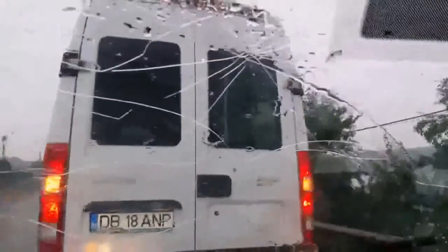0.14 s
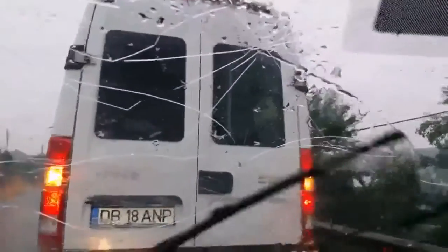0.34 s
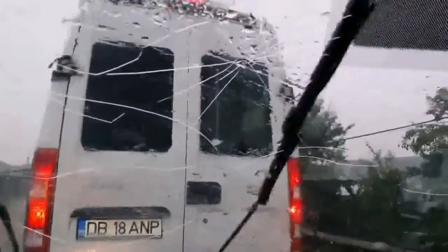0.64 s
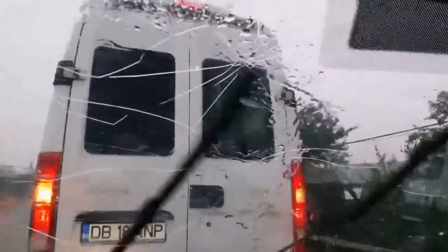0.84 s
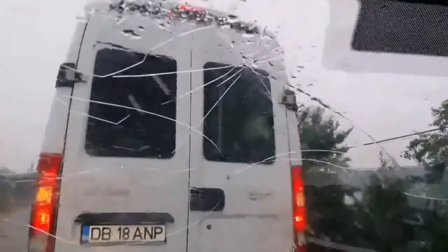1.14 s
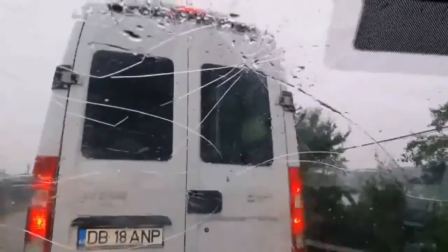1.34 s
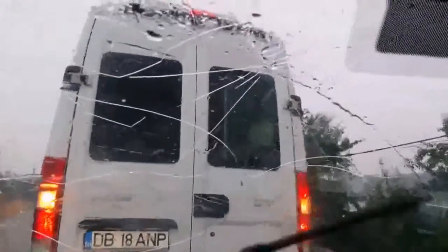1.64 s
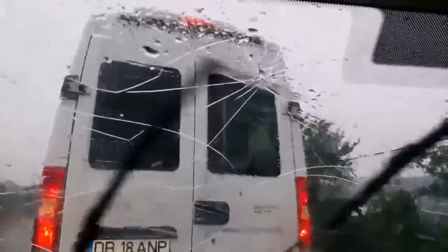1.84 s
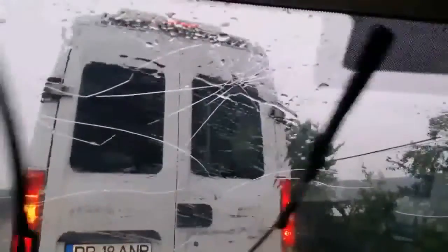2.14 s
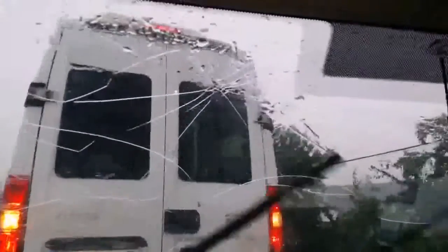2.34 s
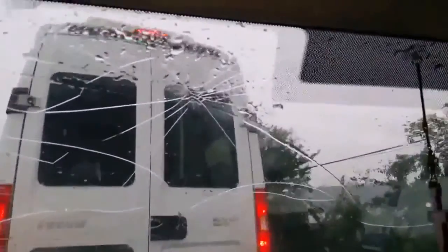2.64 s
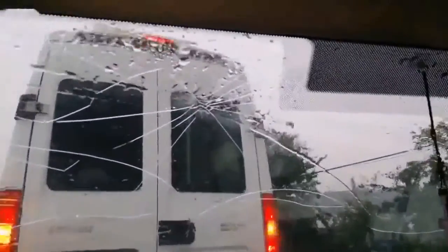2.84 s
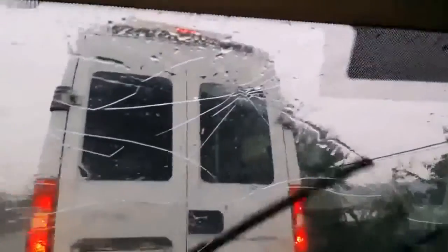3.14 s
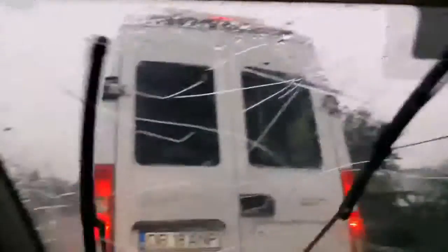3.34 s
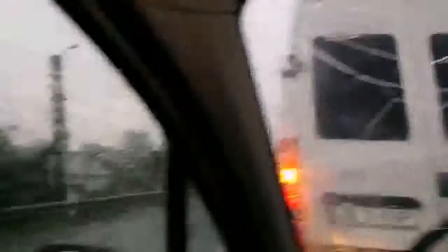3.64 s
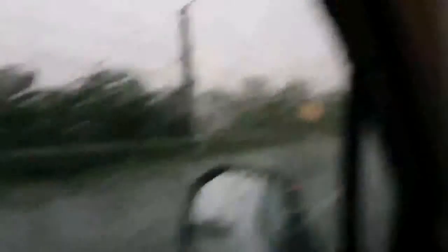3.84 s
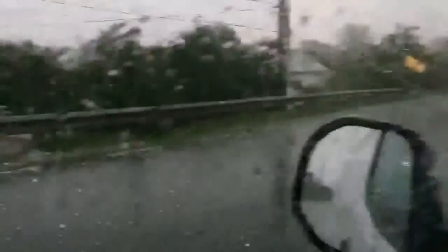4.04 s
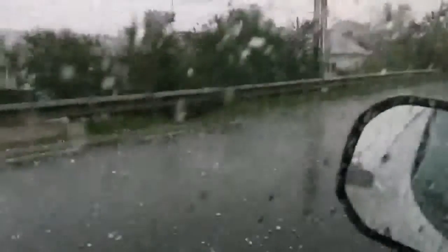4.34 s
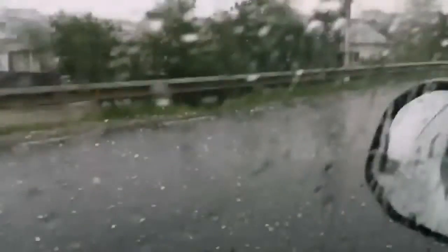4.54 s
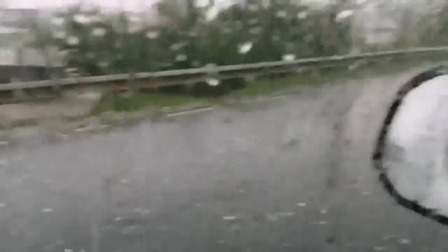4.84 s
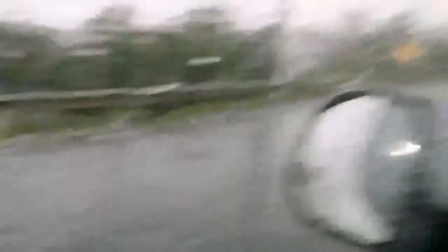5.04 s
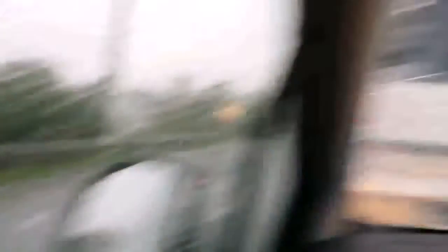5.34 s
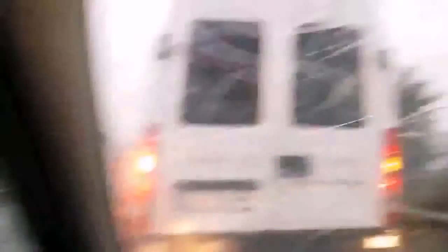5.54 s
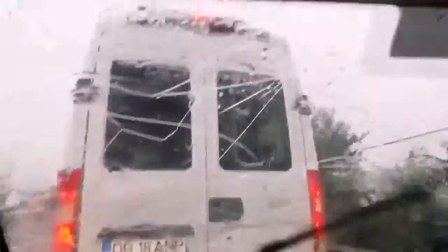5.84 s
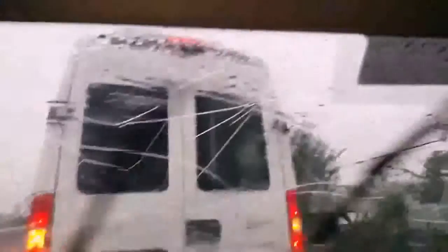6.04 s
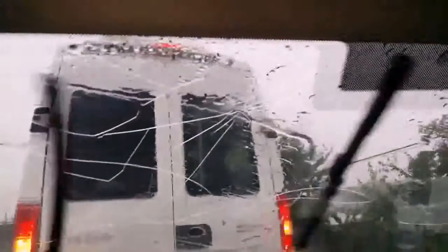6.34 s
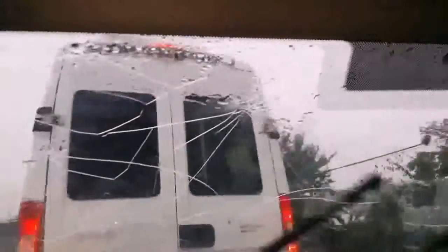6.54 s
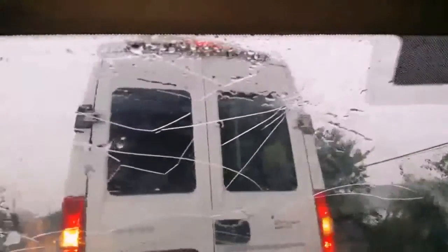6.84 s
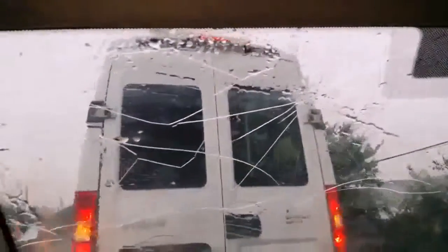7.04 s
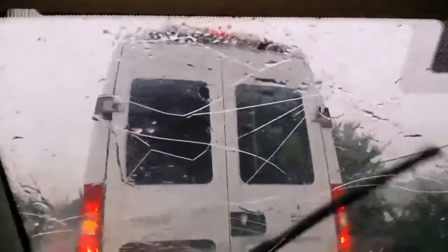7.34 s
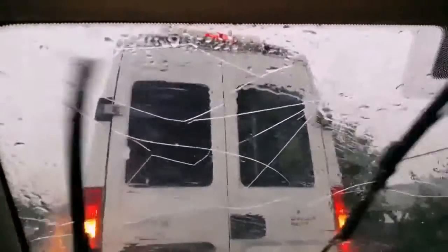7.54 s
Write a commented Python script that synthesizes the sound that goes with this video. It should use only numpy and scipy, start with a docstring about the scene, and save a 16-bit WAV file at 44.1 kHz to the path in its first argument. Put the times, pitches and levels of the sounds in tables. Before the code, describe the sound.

Loud, irregular hail impacts heard from inside a car: hollow metal roof thuds, sharp glass cracks, fine icy patter and a low steady rumble.

```python
"""A bright crack of ice on glass comes first; then big hailstones boom on a car's steel roof.
More cracks fall on the panes and small stones tick between them, over road rumble and the hiss of sleet.
Each source is band noise, its power shaped by blows that build up and ring out or by a steady bed.
The cabin adds narrow resonances; the recorder's limiters flatten the loudest blows."""
import sys
import numpy as np
from scipy import signal
from scipy.io import wavfile
from scipy.ndimage import uniform_filter1d, minimum_filter1d

SR = 44100
rng = np.random.default_rng(int(sys.argv[2]) if len(sys.argv) > 2 else 0)


def put_to_file(sound):
    """Save the sound as 16-bit audio at rate SR, in the file named by the first command-line argument."""
    columns = np.atleast_2d(sound).T  # one column per channel
    safe = np.clip(columns, -1, 1)
    whole_steps = np.round(safe * 32767)
    wavfile.write(sys.argv[1], SR, whole_steps.astype(np.int16))


N = 338688

# Big stones on the roof; levels are relative:
# start_s, force_db, hollow_thud_db, hardness_db, ring_length [factor on t60]
ROOF_BLOWS = [(0.434, -9.5, 0.5, 1, 0.86), (.515, -7, -0.5, -8.5, 0.74), (0.97, -0.5, -1.5, -0.5, 0.98),
              (1.304, -6.5, 0.5, 4, 1.08), (1.811, -2, 1.5, 0, 1.234), (2.225, -12, -2, -15, 0.4),
              (2.786, -6, 1.5, -13.5, 0.73), (2.987, -6.5, 1.5, 0, 0.91), (3.926, -21, 9.5, 0.5, 0.77),
              (5.081, -24, 9, -6, 0.66), (5.122, -11, 7, -3.5, 0.79), (6.115, -1.5, 0, -3, 1.21),
              (6.441, -5, 3.5, 4.5, 1.03), (6.731, -6, 0, -0.5, 1.23), (7.159, -4, -4.5, 0.5, 1.13),
              (7.300, -23, -4, -5.5, 1.7)]
# Big stones on the glass; levels are relative:
# start_s, force_db, boom_db, hardness_db, ring_length [factor on t60]
GLASS_BLOWS = [(0.031, 7, 3, 1, 0.68), (1.424, -2, 1.5, 6.5, 0.81), (2.448, 2.5, -10.5, 1, 1.09),
               (3.376, -0.5, -4.5, -5.5, 1), (4.162, 5, 6.5, 5.5, 0.68), (4.198, 3.5, 6, -5, 0.51),
               (4.563, -2.5, 0, 5, 0.83), (4.669, -13, 8.5, 4.5, 0.72), (4.8, -25.5, 1, 9, 1.06),
               (5.527, -2, -11.5, 2, 0.9), (7.057, -29.5, 13.5, 21.5, 0.82), (7.237, -0.5, 3, 0, 0.9),
               (7.358, -6, -11, -2, 0.97), (7.414, 1, -11, 0.5, 0.72)]
# The clearest small stones: start_s, relative force_db, ring_length [factor on t60]
SINGLE_TICKS = [(.124, -25.5, 0.89), (.294, -27.5, 1.4), (.324, -31, 1.1), (.591, -22.5, 0.86),
                (.773, -19, .25), (1.146, -32, 1.35), (1.653, -30.5, 0.37), (2.093, -27.5, 1.3),
                (2.177, -34, 1.6), (2.342, -33.5, .8), (2.555, -31, 0.27), (2.612, -33, 0.63),
                (2.64, -32, 2.2), (2.699, -29, 0.42), (2.757, -28, 0.5), (2.963, -26, 0.19),
                (3.471, -26.5, 1.36), (3.537, -30.5, 1.6), (3.624, -31.5, 0.91), (4.071, -33.5, 0.49),
                (4.133, -16.5, 0.33), (4.351, -27.5, 0.25), (4.909, -27.5, 0.56), (5.671, -30, 1.6),
                (5.739, -29, 1.8), (5.817, -28.5, 3.5), (6.261, -18.5, 0.45), (6.978, -28, 0.56),
                (7.036, -24.5, 0.4), (7.122, -21, 0.95)]

# Spectrum and decay of the struck steel roof:
# frequency_hz, relative density_db [per Hz], t60_s [before the ring length factor]
ROOF_MODES = [(59.5, -12.5, 0.596), (109.4, -0.9, 1), (182, 1, 0.85), (316, -1.34, 0.71), (573, -3, 0.54),
              (1070, -8, 0.32), (1410, -6, 0.3), (2085, -10, 0.24), (3030, -14.5, 0.19),
              (5270, -11.5, 0.17), (7100, -38, 0.19)]
# The same for the struck glass: frequency_hz, relative density_db [per Hz], t60_s
GLASS_MODES = [(59.7, -7.5, 0.3), (112.4, 2, 0.5), (186, 0.5, 0.43), (326, -3, 0.32), (556, -4.5, 0.2),
               (980, -3, 0.12), (1360, -11, 0.15), (1890, -1, 0.065), (2940, -8, 0.1), (5130, -5.5, 0.074),
               (6800, -18, 0.05)]
# The same for small pellets: frequency_hz, relative density_db [per Hz], t60_s
PELLET_MODES = [(61.5, 2.5, 0.13), (110, -4, 0.13), (180, 5, 0.15), (350, 7.5, 0.092), (600, 2.5, 0.17),
                (1000, -2, 0.2), (1390, -4, 0.3), (2010, -2, 0.13), (3200, 0.5, 0.14), (4940, 4, 0.12),
                (7150, -8.5, 0.046)]

# Spectrum of road rumble and sleet hiss, before their levels: frequency_hz, density_db [per Hz]
BED_SPECTRUM = [(25, -65), (60, -62.5), (110, -56.5), (180, -59), (350, -65), (600, -74), (1000, -80),
                (1400, -82.5), (2000, -85.5), (3200, -92.5), (5000, -89.5), (7000, -102)]
# Course of the bed's relative levels: time_s, rumble_db, hiss_db
BED_LEVELS = [(0.0, 0.5, 10), (1.5, -3, 3), (3.1, -4, 9), (4.6, -3, 8.5), (6.1, -3.5, 6), (7.7, -4, 13.5)]

# Between the two microphones:
# frequency_hz, likeness [correlation, 0 to 1], left_lag_ms [at bearing 1]
MICROPHONE_LIKENESS = [(30, 0.94, 0.04), (70, 1, 0.12), (130, 1, 0.22), (300, 0.86, 0), (623, 0.43, 0),
                       (1200, 0.6, 0.53), (2480, 0.077, 0.47), (6000, 0.13, .45)]
# Lean of the cabin's sound: frequency_hz, left_minus_right_db
CABIN_BALANCE = [(60, 2.5), (100, -1.5), (170, 1.5), (290, -1), (490, 0), (840, -1.5), (1420, -5),
                 (2400, -2.5), (4060, 11.5), (6880, -16)]
# Resonances of the cabin and its panes: frequency_hz, width_hz, lift_db
CABIN_RESONANCES = [(119.5, 18, -11), (176, 7.5, -7), (264.8, 5.3, -8.5), (320, 11, -3), (362.8, 7.3, -1),
                    (482.5, 3.2, -6), (518.4, 13, -4), (802, 8.7, -12), (1390, 15, -19), (3540, 50, -8),
                    (4670, 46, -20)]

EDGES = np.geomspace(25, 9000, 23)   # Hz
CENTRES = np.sqrt(EDGES[1:] * EDGES[:-1])   # Hz

# A hard stone snaps as it lands on steel; a slushy one only thuds
SNAP_DB, SNAP_PER_HARDNESS = -1, 0.7   # dB, dB per dB
SQUASH_PER_HARDNESS = 0.44   # dB by which the build-up lengthens per dB of softness
ROOF_BOOM_DB = 3.5
# The bigger a pellet, the duller: dB of treble lost per dB of force above a middling one
PELLET_DULLING, MIDDLING_PELLET_DB = 0.25, -34
# Where the blows come from (left minus right, dB), and the scatter of the big ones
ROOF_SIDE_DB, GLASS_SIDE_DB, PELLET_SIDE_DB, SCATTER_DB = -1.1, -2, -1, 2.36
# Shattering ice and shaking trim make every ring-out uneven
RATTLE_DB, RATTLE_PER_S = 1.5, 180


def roof_stones(level_db, rise_cycles, rise_s):
    """Impact on a steel panel: hard stones excite more treble, soft ones squash and build up slowly."""
    power = silent_power()
    gains, t60s = band_gains(ROOF_MODES), per_band(ROOF_MODES, column=2)
    places = rng.standard_normal(len(ROOF_BLOWS))
    for (s, force_db, thud_db, hard_db, ring), place in zip(ROOF_BLOWS, places):
        # some spots answer with a hollow thud
        colour = per_band([(120, ROOF_BOOM_DB), (170, 0), (240, thud_db), (380, thud_db),
                           (620, 0), (1800, 0), (4500, hard_db)])
        blow = gains * from_db(level_db + force_db + colour)
        side_db = ROOF_SIDE_DB + SCATTER_DB * place
        snap = from_db(SNAP_DB + SNAP_PER_HARDNESS * hard_db)
        squash_s = rise_s * from_db(-SQUASH_PER_HARDNESS * hard_db)
        add_blow(power, s, blow, t60s * ring, side_db, rise_cycles, snap, squash_s)
    return power * rattle()


def glass_stones(level_db, rise_cycles, rise_s, thud_share=0.4):
    """Impact on stiff panes: a short crack, brighter with hardness, over a boom that varies with the spot."""
    power = silent_power()
    gains, t60s = band_gains(GLASS_MODES), per_band(GLASS_MODES, column=2)
    places = rng.standard_normal(len(GLASS_BLOWS))
    for (s, force_db, boom_db, hard_db, ring), place in zip(GLASS_BLOWS, places):
        colour = per_band([(110, boom_db), (350, thud_share * boom_db), (750, 0),
                           (1800, 0), (4500, hard_db)])
        blow = gains * from_db(level_db + force_db + colour)
        side_db = GLASS_SIDE_DB + SCATTER_DB * place
        add_blow(power, s, blow, t60s * ring, side_db, rise_cycles, rise_s=rise_s)
    return power * rattle()


def small_stones(level_db, patter_db, spread_db, colour_db, scatter_db, patter_ring, count):
    """Superposition of light impacts: single ticks over a random patter, each pellet with its own colour."""
    power = silent_power()
    gains, t60s = band_gains(PELLET_MODES), per_band(PELLET_MODES, column=2)
    slot_s = N / SR / count
    patter = []
    for k, (when, size, ring) in enumerate(rng.random((count, 3))):   # one grain somewhere in each slot
        patter.append(((k + when) * slot_s, patter_db + spread_db * size, patter_ring * (.5 + ring)))
    for s, force_db, ring in patter + list(SINGLE_TICKS):
        treble_db = -PELLET_DULLING * max(force_db - MIDDLING_PELLET_DB, 0)
        colour = per_band([(1800, 0), (4500, treble_db)])
        colour = colour + colour_db * rng.standard_normal(len(CENTRES))
        blow = gains * from_db(level_db + force_db + colour)
        side_db = PELLET_SIDE_DB + scatter_db * rng.standard_normal()
        add_blow(power, s, blow, t60s * ring, side_db, rise_cycles=1.0, rise_s=0.00081)
    return power


def road_and_sleet(rumble_db, hiss_db, split_hz=800, flurry_db=2.5, count=120):
    """Addition of independent noise powers: tyres and engine mostly below the split, fine sleet above."""
    bands = from_db(per_band(BED_SPECTRUM)) ** 2 * np.diff(EDGES)
    rumble, hiss = in_time(BED_LEVELS)
    flurries = np.interp(np.arange(N), np.linspace(0, N, count), rng.standard_normal(count))
    hiss = hiss + flurry_db * flurries   # the sleet arrives in uneven flurries
    sleet_share = 1 / (1 + (split_hz / CENTRES) ** 2)
    tyres = np.outer(bands * (1 - sleet_share), from_db(rumble + rumble_db) ** 2)
    sleet = np.outer(bands * sleet_share, from_db(hiss + hiss_db) ** 2)
    return (tyres + sleet).astype(np.float32)


def add_blow(power, s, gains, t60s, side_db, rise_cycles, snap=0, rise_s=0.00073):
    """Exponential build-up and decay of struck modes, band by band; the powers of blows sum."""
    start, t60s = round(s * SR), np.maximum(t60s, .01)
    for k, (hz, gain, t60) in enumerate(zip(CENTRES, gains, t60s)):
        t = np.arange(min(int(t60 * SR * 1.3), N - start), dtype=np.float32) / SR
        build = 1 - np.exp(-t / (rise_cycles / hz + rise_s))
        snap_t60 = 0.08 + 12 / hz
        ring_out = np.exp(-np.log(1e6) * t / t60)   # power falls 60 dB in t60
        fade = ring_out + snap ** 2 * np.exp(-np.log(1e6) * t / snap_t60)
        sides = pan(side_db * hz / (hz + 500))   # the bass reaches both microphones alike
        power[:, k, start:start + len(t)] += (gain * sides) ** 2 * (build ** 2 * fade)


def rattle():
    """Amplitude modulation: a fast, uneven swing of power shared by all bands of a struck panel."""
    knots = rng.standard_normal(N * RATTLE_PER_S // SR + 2)
    swing = np.interp(np.arange(N) * RATTLE_PER_S / SR, np.arange(len(knots)), knots)
    return (from_db(RATTLE_DB * swing) ** 2).astype(np.float32)


def noise_bands(evenness, bearing):
    """Modal overlap: modes too close to tell apart act as stereo noise of rms 1 in each band."""
    white, bands = rng.standard_normal((2, 2, N)), []
    likeness = np.clip(per_band(MICROPHONE_LIKENESS), -.99, .99)
    # bearing: 0 straight ahead, 1 well to the right
    lag_ms = bearing * per_band(MICROPHONE_LIKENESS, column=2)
    for k, (alike, lean_db) in enumerate(zip(likeness, per_band(CABIN_BALANCE))):
        band_pass = signal.butter(2, EDGES[k:k + 2], "band", fs=SR, output="sos")
        mid, side = signal.sosfilt(band_pass, white[k % 2])
        pair = np.sqrt(1 + alike) * mid + np.sqrt(1 - alike) * side * [[1], [-1]]
        pair[0] = np.roll(pair[0], round(lag_ms[k] * SR / 1000))
        swell = uniform_filter1d(np.mean(pair ** 2, axis=0), size=2000) + 1e-18
        # ringing modes beat less deeply than free noise
        pair = pan(lean_db) * pair / swell ** (evenness / 2)
        bands.append(pair / pair.std())
    return np.array(bands, dtype=np.float32)


def sounding(power, evenness, bearing):
    """Amplitude is the root of power: band powers (2 x bands x N) scale the crowded modes, then sum."""
    return np.einsum("cbn,bcn->cn", np.sqrt(power), noise_bands(evenness, bearing))


def cabin(x, through_db=-1):
    """Resonance of an enclosure: narrow peaks are added to everything that sounds in the cabin."""
    out = from_db(through_db) * x
    for hz, width, lift_db in CABIN_RESONANCES:
        b, a = signal.iirpeak(hz, hz / width, fs=SR)
        out = out + from_db(lift_db) * signal.lfilter(b, a, x)
    return out


def from_db(db):
    """Decibel law: level in dB to amplitude."""
    return 10 ** (np.asarray(db) / 20)


def in_time(rows):
    """Linear interpolation: the columns of a curve, sample by sample."""
    s, *columns = np.transpose(rows)
    return [np.interp(np.arange(N) / SR, s, c) for c in columns]


def per_band(points, column=1):
    """Interpolation over log frequency: one column of a table, read at the band centres."""
    points = np.array(points)
    return np.interp(np.log(CENTRES), np.log(points[:, 0]), points[:, column])


def band_gains(points):
    """Density times bandwidth is power: band amplitudes of a spectrum scaled to total power 1."""
    gain = from_db(per_band(points)) * np.sqrt(np.diff(EDGES))
    return gain / np.linalg.norm(gain)


def pan(db):
    """Interchannel level difference, split evenly into left and right gains."""
    return from_db(np.array([[.5], [-.5]]) * db)


def silent_power():
    """Zero energy before any blow: channels x bands x samples."""
    return np.zeros((2, len(CENTRES), N), np.float32)


def scene():
    """Superposition in the cabin: roof and road share one bearing, glass and pellets one further right."""
    roof = roof_stones(level_db=1.0, rise_cycles=0.44, rise_s=0.0052)
    roof += road_and_sleet(rumble_db=1.5, hiss_db=-3)
    glass = glass_stones(level_db=1.0, rise_cycles=0.33, rise_s=0.0014)
    glass += small_stones(level_db=2, patter_db=-48, spread_db=13, colour_db=4.5,
                          scatter_db=4.5, patter_ring=0.48, count=230)
    overhead = sounding(roof, evenness=0.52, bearing=0.7)
    beside = sounding(glass, evenness=0.7, bearing=0.97)
    return cabin(overhead + beside)


def limiter(x, ceiling_db, release_db_per_s, ahead_s):
    """Look-ahead gain control: turns down just before each peak and recovers at a steady rate."""
    over = np.maximum(20 * np.log10(np.abs(x).max(axis=0) + 1e-9) - ceiling_db, 0)
    ramp = release_db_per_s * np.arange(N) / SR
    held = np.maximum.accumulate(over + ramp) - ramp
    size = 2 * int(ahead_s * SR / 2) + 1
    ahead = -minimum_filter1d(-held, size, origin=-(size // 2))
    return x * from_db(-uniform_filter1d(ahead, size))


def record(dry, low_cut_hz=35, split_hz=900, top=1.155, treble_cut_hz=7350):
    """Two-band compression and saturation: bass cut, limiters, rounded peaks, treble cut, clipping."""
    lean = signal.sosfilt(signal.butter(1, low_cut_hz, "high", fs=SR, output="sos"), dry)
    bass = signal.sosfilt(signal.butter(2, split_hz, fs=SR, output="sos"), lean)
    # inverted, so the crossover leaves no notch
    treble = -signal.sosfilt(signal.butter(2, split_hz, "high", fs=SR, output="sos"), lean)
    bass = limiter(bass, ceiling_db=-1, release_db_per_s=431, ahead_s=0.016)
    treble = limiter(treble, ceiling_db=5.0, release_db_per_s=431, ahead_s=0.021)
    both = limiter(bass + treble, ceiling_db=2.5, release_db_per_s=595, ahead_s=0.0053)
    rounded = top * np.tanh(both / top)
    steep_cut = signal.ellip(10, .3, 70, treble_cut_hz, fs=SR, output="sos")
    clipped = np.clip(signal.sosfilt(steep_cut, rounded), -1, 1)
    # clipping adds new treble; the last filter trims its top
    return signal.sosfilt(signal.butter(12, 15500, fs=SR, output="sos"), clipped)


dry = scene()
out = record(dry)
put_to_file(out)
```